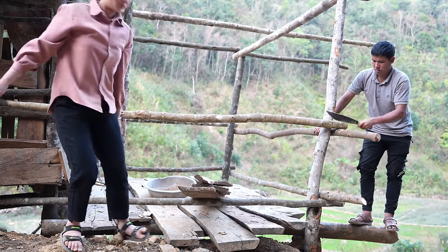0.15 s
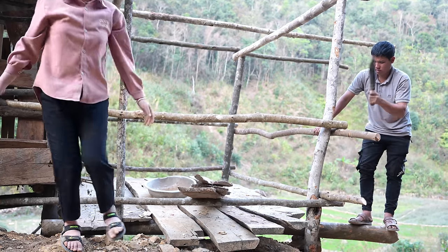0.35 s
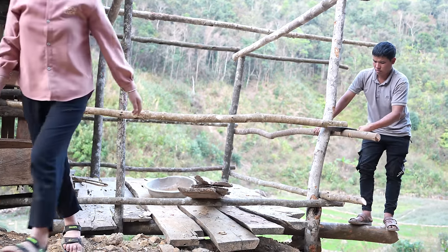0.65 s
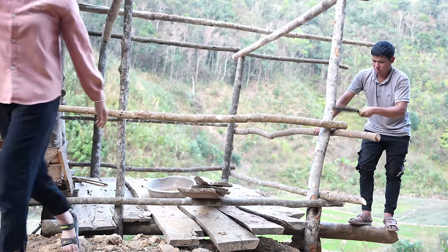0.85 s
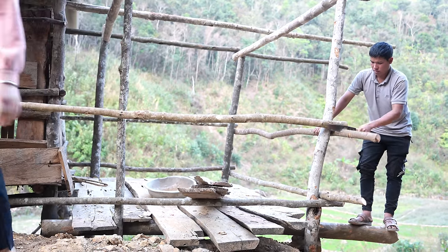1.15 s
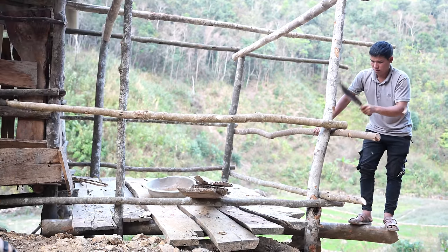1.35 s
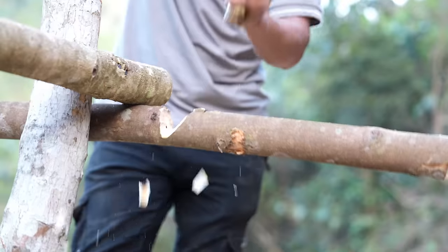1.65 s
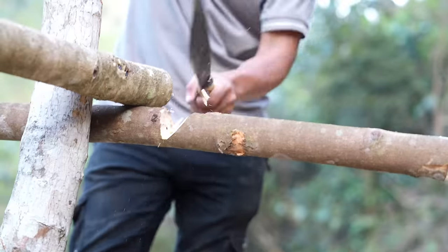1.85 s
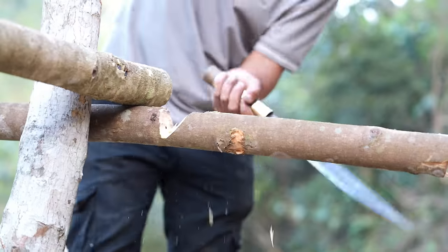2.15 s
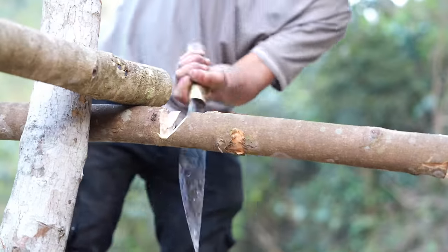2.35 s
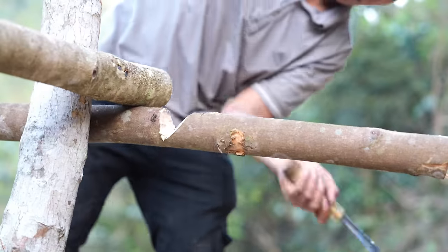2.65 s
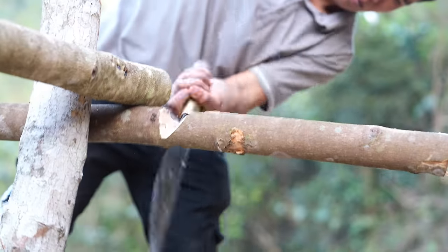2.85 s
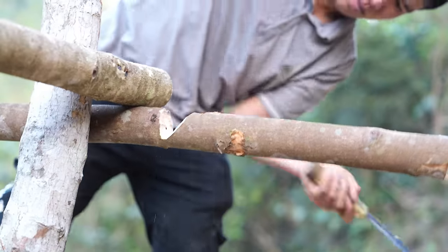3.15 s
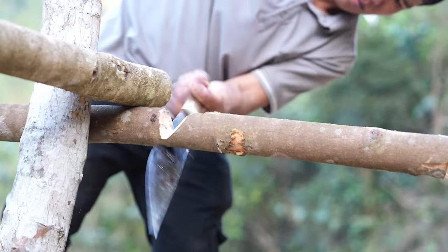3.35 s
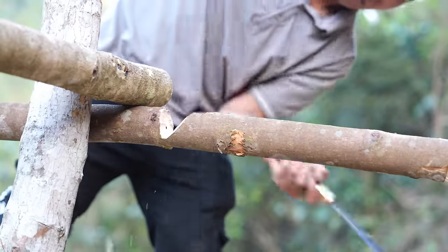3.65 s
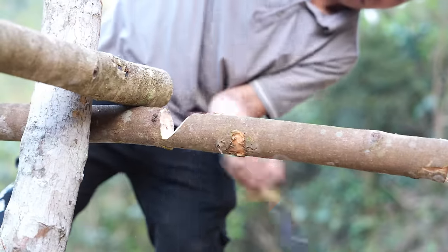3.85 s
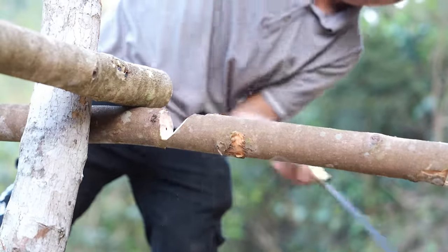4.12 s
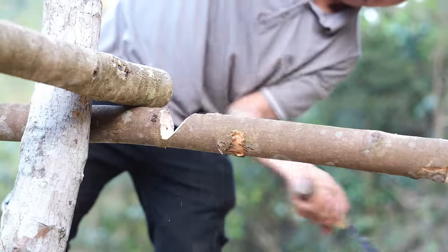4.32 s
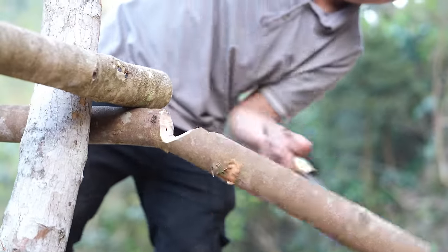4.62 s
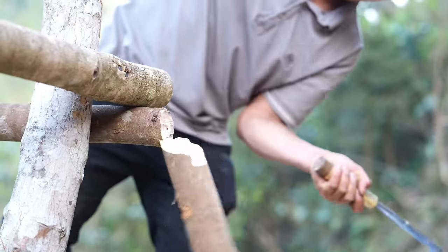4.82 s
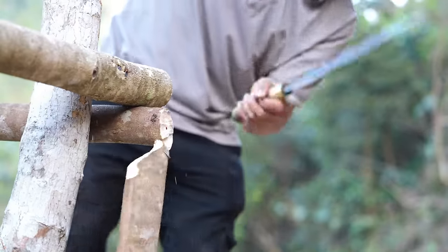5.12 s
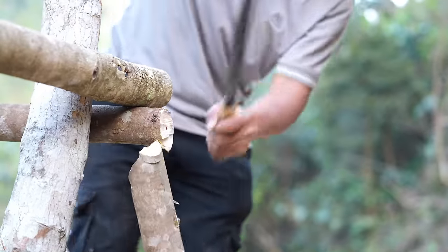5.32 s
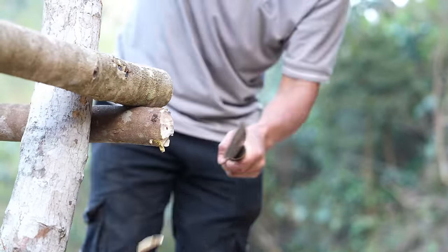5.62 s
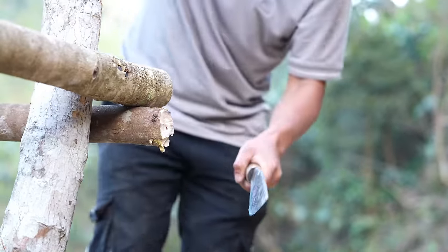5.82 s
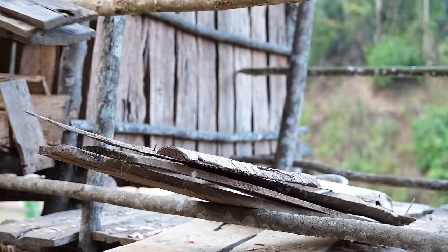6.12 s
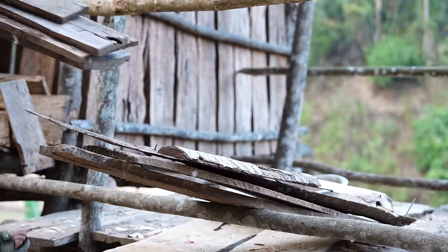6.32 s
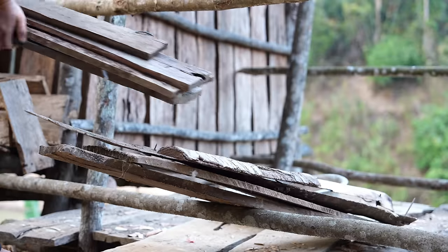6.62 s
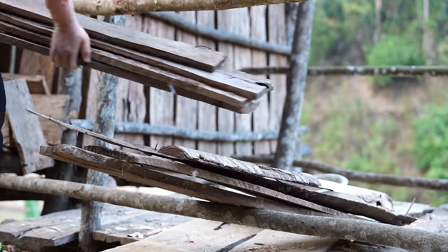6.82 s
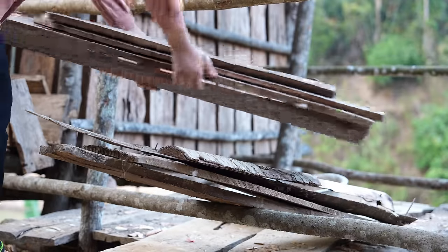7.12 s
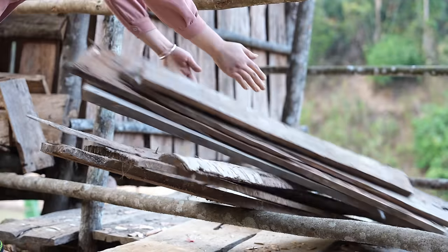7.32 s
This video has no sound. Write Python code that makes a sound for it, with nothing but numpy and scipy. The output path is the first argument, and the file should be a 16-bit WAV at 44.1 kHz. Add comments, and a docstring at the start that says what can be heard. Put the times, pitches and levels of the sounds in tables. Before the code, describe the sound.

Sharp, hollow blade blows on a wooden pole every half second outdoors, a splintering break, thuds of cut wood, then dry planks clattering.

```python
"""A machete chops through a pole of a wooden frame: each blow is a noisy crack plus dispersive bending waves,
whose treble arrives ahead of the bass, with decaying sine notes and a diffuse noise echo of the yard.
Fibres snap as filtered noise bursts, the last strip rips in random clicks, and cut wood drops with a push and modes.
Dropped planks and loose boards clatter as bouncing sets of modes; cloth and wood rub as band-shaped noise.
Gliding sines whistle like a bird over a faint drone and the patchy noise of breeze, leaves and insects."""
import sys
import numpy as np
from scipy import signal
from scipy.fft import rfft, irfft
from scipy.io import wavfile
from scipy.ndimage import uniform_filter1d

SR = 44100
rng = np.random.default_rng(int(sys.argv[2]) if len(sys.argv) > 2 else 0)


def file_out(sig):
    """Save sig as 16-bit WAV at sys.argv[1]."""
    # one column per channel
    cols = np.atleast_2d(sig).T
    # limit, then scale
    lim = np.clip(cols, -1, 1)
    pcm = np.round(lim * 32767).astype(np.int16)
    wavfile.write(sys.argv[1], SR, pcm)


N = 329427
SIZE = 32768  # samples in one event and its filters
HZ, T = np.fft.rfftfreq(SIZE, 1 / SR), np.arange(SIZE) / SR
EDGE_HZ = 16100  # upper band limit

# Machete blows. Each row: start in seconds, strength in dB, extra bass in dB, extra treble in dB,
# extra crack in dB, ring length as a factor, low note in Hz, knock in Hz.
BLOWS = [(0.1147, 0, -7.5, -5, 0.5, 0.72, 218, 2135), (0.637, -8.5, -5, 1, 5.5, 1.046, 132, 830),
         (1.203, -13.5, -0.5, 8, 0, 1.286, 173, 1007), (1.803, -1.5, -1, -1, 4, 1.275, 223.7, 963),
         (2.342, 0, 4, -0.5, -2.5, .52, 182, 1230), (2.876, 1.5, 1, -1, -2.5, 0.99, 263.4, 1015),
         (3.391, -6, 4.5, 7.5, 2, 1.135, 163.5, 1830), (3.9451, -0.5, 0.5, 2.5, 1, 1.095, 169.5, 996),
         (4.447, -12, 6.5, 14, 0, 1.31, 196, 1270), (4.977, -2, 2, -4.5, 0, 0.58, 433, 792),
         (5.407, -11, -4, 6.5, -4, 0.51, 384, 1295), (6.190, -8, -2.5, 2.5, 2, .65, 103, 1666),
         (6.799, -3.5, -3, -7.5, 3.5, 0.3, 109.7, 1566), (7.346, 1.5, -15, -8, 4.5, 0.5, 106.4, 1645)]
# Broad response of the pole. Each row: frequency in Hz, level in dB before the blow's colour.
POLE_RESPONSE = [(40, -27.5), (100, -13.5), (180, 4), (330, -1), (600, -4), (1000, -1), (2000, -0.5),
                 (3200, -20.5), (5200, -10.5), (8000, -27), (16000, -44)]
# Damping of the pole. Each row: frequency in Hz, t60 in seconds before the blow's ring length factor.
POLE_DAMPING = [(100, 0.51), (300, 0.37), (600, 0.33), (1100, 0.14), (2200, 0.064), (8000, 0.12)]
# Resonances of the pole. Each row: frequency in Hz, width in Hz, height in dB above the broad response.
POLE_RESONANCES = [(308.6, 89, 5.6), (407.4, 21, 8.4), (472, 34, 5.3), (620, 140, 3.5), (964, 180, 5.9),
                   (1205, 68, 2.1), (1934, 250, 7.1)]
# Left-right likeness of the bending waves. Each row: frequency in Hz, correlation from -1 to 1.
POLE_LIKENESS = [(200, 1.0), (600, 0.94), (1500, 0.32), (4000, 0.051)]
# Spectrum of the blade's crack. Each row: frequency in Hz, level in dB before the blow's colour.
CRACK_SPECTRUM = [(60, -49), (250, 6.5), (500, -23.5), (1200, -9), (2600, -7), (3500, -15.5), (5200, -9.5),
                  (7000, -18), (10000, -20.5), (16000, -26)]
# Where the wood responds unevenly. Each row: frequency in Hz, share of the unevenness.
UNEVEN_SHARE = [(400, .3), (800, 1), (2500, 1), (5000, .5), (10000, .3)]
# Spectrum of the yard's answer. Each row: frequency in Hz, level in dB before the strength of the event.
YARD_SPECTRUM = [(30, -26.5), (80, -7.5), (200, -14.5), (500, -19.5), (1000, -21.5), (2000, -24.5),
                 (3400, -33), (5400, -29.5), (7000, -33.5), (9500, -38), (11000, -45), (16000, -47.5)]
# Decay of the yard's answer. Each row: frequency in Hz, t60 in seconds before any extra damping.
YARD_DECAY = [(80, 1.31), (250, 0.7), (1000, 0.6), (5000, 0.57), (14000, 0.5)]
# Left-right likeness of the echo. Each row: frequency in Hz, correlation from -1 to 1.
YARD_LIKENESS = [(150, 1), (450, 1), (900, 0.37), (1800, 0.03), (4000, -0.34), (12000, 0.26)]
# Left-right likeness of near contacts. Each row: frequency in Hz, correlation from -1 to 1.
NEAR_LIKENESS = [(200, 1), (700, 0.93), (2000, 0.47), (5000, 0.33), (12000, 0.034)]

# Blows sound from close by between these times, and from across the yard before and after.
CLOSE_FROM_S, CLOSE_TO_S = 1.58, 6.03
# What distance does to a blow. Each row: yard in dB, low note in dB, knock in dB, top octave in dB.
CLOSE_BLOW = (2, -13.5, -12.5, 3)
FAR_BLOW = (8.5, -21, -17.5, 0)
# Lean of the blows to the left. Each row: frequency in Hz, left minus right in dB.
CLOSE_BALANCE = [(120, 5), (280, 2), (600, 7.5), (1500, 2.5), (4000, 0.5), (12000, 3.5)]
FAR_BALANCE = [(200, 0), (1500, -1.2), (6000, -2.5)]
BASS_HZ, MIDDLE_HZ, TREBLE_HZ, TOP_HZ = 395, 1220, 5300, 11000  # corners of the blow's colour
STIR_DB_PER_RING = 14.5  # a pole that rings longer builds up its low note and stirs the yard more

# Snapping fibres and ticks of wood. Each row: start in seconds, level in dB, extra body up to 2 kHz in dB.
FIBRE_SNAPS = [(1.3582, -15.5, 15), (1.949, -14, -5), (2.038, -19, 5.5), (3.667, -10, -3),
               (4.352, -18.5, 3), (4.543, -8.5, 0), (4.581, -13, 4), (4.623, -4.5, -3), (4.657, -4, 3),
               (4.663, -2.5, 4.5), (4.672, 2, -2), (4.708, -13, 6), (5.41, -0.5, 8), (5.425, -5, 5.5),
               (6.795, -10.5, 3), (7.343, -6.5, 9.5), (7.450, -1, 0)]
# Spectrum of a snapping fibre. Each row: frequency in Hz, level in dB before that of the snap.
SNAP_SPECTRUM = [(40, -44), (200, -19), (700, -15.5), (1900, -17.5), (3300, -17), (5500, -15.5),
                 (9000, -19), (16000, -23.5)]
CRUMB_FROM_S, CRUMB_FALL_S = .06, 0.3  # crumbs land this soon after a close blow, and for this long
# Spectrum of the ripping strip. Each row: frequency in Hz, level in dB before that of the crunch.
RIP_SPECTRUM = [(100, -38), (800, -12), (2200, -1), (4500, -23), (8000, -15), (16000, -3)]

# Boards that clatter: dropped planks, and loose boards rattling after far blows. Each row: start in seconds,
# level in dB, settling time in seconds, pitch factor of the board, extra thud in dB.
BOARD_CLATTERS = [(.004, -14.5, 0.0057, 1.1, 13), (.026, -12.5, 0.024, 1.03, 9.5),
                  (.074, -10, 0.0096, 0.81, 4.5), (.116, -7.5, 0.015, 0.93, 9),
                  (0.1634, -7, 0.0066, 1.04, 7.5), (.176, -18.5, 0.059, 0.83, 14), (.227, 0, .008, .9, -7),
                  (.337, -20.5, 0.0053, .9, 7), (.385, -21, .006, .9, 9.5), (.397, -14, 0.011, 0.83, 7.5),
                  (6.208, -4, 0.015, 1.06, 2.5), (6.231, -5.5, 0.02, 0.96, -0.5),
                  (6.803, -3.5, 0.036, 1.04, -1.5), (6.8398, -5, 0.029, 1.07, -5),
                  (6.877, -19.5, 0.026, 0.71, 7), (7.356, -2.5, .012, 1.23, -3.5),
                  (7.37, -4.5, 0.019, 1.13, -5.5), (7.4056, -2.5, .008, 1.18, -17),
                  (7.42, -12, .025, 1.08, -6), (7.439, -6.5, 0.0092, 1.1, -9), (7.451, -6.5, 0.035, .8, 4)]
# Modes of a plank. Each row: frequency in Hz before the pitch factors, level in dB before the clatter's, t60 in s.
BOARD_MODES = [(534, -26, 0.051), (699, -24.5, 0.22), (915, -22.5, .07), (969, -26, 0.02),
               (1143, -21, 0.066), (1280, -10, 0.042), (1469, -17.5, 0.07), (1756, -19.5, 0.078),
               (2090, -19, 0.12), (2240, -25, 0.036), (2840, -38, 0.12)]
# Rasp of split grain. Each row: frequency in Hz before the pitch factor, level in dB before the clatter's.
RASP_SPECTRUM = [(40, -35), (100, -29), (400, -20), (800, 1.5), (1700, -15.5), (2500, -14), (3600, -25),
                 (6000, -33.5), (9000, -71), (16000, -57)]
# Clap of the edges. Each row: frequency in Hz before the pitch factor, level in dB before the clatter's.
CLAP_SPECTRUM = [(200, -72), (1200, 7), (2100, -10.5), (3000, -8), (4200, -43), (12000, -43)]
# Thud of the deck. Each row: frequency in Hz, level in dB before the clatter's.
DECK_SPECTRUM = [(40, -50), (130, -7.0), (250, -6.0), (500, -0.5), (1000, -6.5), (3000, -41.5)]
# Echo of the planks. Each row: frequency in Hz, level in dB before the clatter's.
BOARD_ECHO = [(40, -62), (100, -23), (300, -25), (800, -14.5), (1500, -16.5), (2500, -26.5), (4000, -35),
              (7000, -43.5), (16000, -63)]
SETTLE_DB, SETTLE_PITCH = 10.5, .92  # bounces lose this much, and ring this much lower, after one settling time
BOUNCE_S, BOUNCE_JITTER = .008, .55  # mean time between bounces, and the share of chance in it
BOUNCE_SPREAD_DB = 0.5  # unevenness of the bounces

# A chip and later the cut end on the ground. Each row: start in seconds, thump in dB, ring in dB,
# most excited frequency in Hz, grit in dB.
GROUND_DROPS = [(2.456, -53, -42.5, 1770, -42), (5.7532, -11.5, -17, 800, -14),
                (5.825, -16.5, -25.5, 1230, -12.5), (5.8443, -15.5, -26.5, 1880, -9)]
# Modes of the cut wood. Each row: frequency in Hz, level in dB before the drop's, t60 in seconds.
CUT_WOOD_MODES = [(336, 9, 0.08), (816, -2, 0.18), (934, -2.5, 0.044), (1210, -4.5, 0.045),
                  (1817, -4, 0.052), (1877, 5, 0.068), (2930, -2.5, 0.057)]
# Feet and carried boards. Each row: start in seconds, length in seconds, RMS level in dB, centre in Hz.
FOOT_RUBS = [(1.568, 0.1, -47, 1340), (7.15, 0.2, -57, 1500)]
# Sleeve down, blade swish and arm lift at a full, close blow. Each row: delay in seconds before jitter,
# length in seconds, RMS level in dB, centre in Hz.
ARM_RUBS = [(-.12, 0.051, -54.5, 760), (-.04, 0.04, -56.5, 1070), (0.278, 0.074, -46.5, 836)]
SWING_JITTER_S = 0.019  # scale of the chance in each delay
FULL_SWINGS_UNTIL_S = 4.2  # once the pole is nearly through, short strokes finish it

# Rising bird whistles. Each row: start in seconds, length in seconds, start in Hz, end in Hz, peak level in dB.
BIRD_WHISTLES = [(1.007, 0.29, 5300, 5900, -51), (1.412, .2, 6050, 6500, -54),
                 (2.611, .31, 4930, 5650, -51), (3.159, .24, 5960, 6380, -50.5),
                 (5.844, .19, 5360, 6260, -47)]
# Outdoor air. Each row: frequency in Hz, level in dB before the band levels below.
AIR_SPECTRUM = [(20, -52), (45, -54), (75, -41.5), (130, -49), (300, -52.5), (900, -50.5), (1700, -52.5),
                (3000, -58), (4800, -58), (5900, -53.5), (7000, -58.5), (10000, -66), (16000, -69.5)]
# Long steady stretches of air. Each row: from seconds, extra rumble in dB, extra middle in dB, extra hiss in dB.
AIR_BANDS = [(0, 7.5, 4.5, 3), (1.58, 17.5, 10.5, 7.5), (4.95, 7.5, 4, 5.5), (6.03, -21, 5, -3)]
# Left-right likeness of the air. Each row: frequency in Hz, correlation from -1 to 1.
AIR_LIKENESS = [(150, 1.0), (500, 0.64), (1200, 0.37), (3000, -0.36), (9000, -0.012)]


def chops(crack_pan_db=-3, pole_pan_db=1, yard_pan_db=0.8):
    """Impact excitation: the blade cracks into the wood, the pole rings and the yard answers."""
    out = np.zeros((2, N))
    pole_db = read(POLE_RESPONSE, HZ)
    for hz, width, height_db in POLE_RESONANCES:
        pole_db = pole_db + height_db / (1 + (2 * (HZ - hz) / width) ** 2)
    for s, db, bass, treble, crack_db, length, note_hz, knock_hz in BLOWS:
        yard_db, note_db, knock_db, top_db = CLOSE_BLOW if is_close(s) else FAR_BLOW
        balance = CLOSE_BALANCE if is_close(s) else FAR_BALANCE
        tilt = [(BASS_HZ, bass), (MIDDLE_HZ, 0), (TREBLE_HZ, treble), (TOP_HZ, treble + top_db)]
        colour = db + read(tilt, HZ) + uneven(depth_db=3.6) * read(UNEVEN_SHARE, HZ)
        stir_db = STIR_DB_PER_RING * (length - 1)
        crack = burst(t60=0.047) + 1.28 * burst(t60=0.0087)  # a slower and a sharper decay together
        blow = np.zeros((2, SIZE))
        add(blow, 0, coloured(crack, read(CRACK_SPECTRUM, HZ) + colour + crack_db - 2.5), crack_pan_db)
        add(blow, 0, coloured(bending(length), pole_db + colour), pole_pan_db)
        add(blow, 0, note(knock_hz, db + knock_db, rise=0.0032, t60=0.051))
        add(out, s, leaning(blow, balance))
        low_note = note(note_hz, db + bass + note_db + stir_db, rise=0.032, t60=0.21)
        add(out, s, low_note, pan_db=-3.0)
        answer_db = read(YARD_SPECTRUM, HZ) + colour + yard_db + stir_db
        add(out, s, coloured(echo(rise=0.021), answer_db), yard_pan_db)
    return out


def bending(length, step=.0048, build=2.72, count=26):
    """Dispersion: waves return along longer paths, their speed growing about as the root of frequency."""
    place, flip, stray = rng.random((3, count, 1))
    trips = np.arange(count)[:, None] + place
    gap = step * np.sqrt(1000 / (HZ + 20))  # seconds between arrivals, longer in the bass
    delay = trips * gap
    decay = gain_of(-60 * delay / (length * read(POLE_DAMPING, HZ)))
    arrivals = np.exp(-4j * np.pi * delay * (HZ + 20)) * decay  # doubled phase: group delay equals delay
    arrivals *= np.sign(flip - .5) * (1 - np.exp(-trips / build)) * np.sqrt(gap * SR)
    left = arrivals.sum(0)
    other = (arrivals * np.sign(stray - .5)).sum(0)
    return irfft(partly_alike(left, other, read(POLE_LIKENESS, HZ)))


def burst(t60):
    """Exponential decay: the brief noisy rush of crushed wood at a contact."""
    return noise(NEAR_LIKENESS, flat, count=8192) * gain_of(-60 * T[:8192] / t60)


def note(hz, db, rise, t60):
    """Modal resonance: one sine mode builds up and dies."""
    envelope = gain_of(db + 6 - 60 * T / t60) * (1 - np.exp(-T / rise)) ** 2
    return envelope * np.sin(2 * np.pi * hz * T)


def uneven(depth_db, size=170):
    """Position-dependent response: wood rings unevenly, differently at every struck place (dB on the grid HZ)."""
    bumps = rng.standard_normal(size)
    return depth_db * np.interp(np.sqrt(HZ), np.linspace(0, np.sqrt(HZ[-1]), size), bumps)


def echo(rise=0.0019):
    """Diffuse scattering: sheds, ground and trees return noise that decays by frequency."""
    decaying = noise(YARD_LIKENESS, lambda hz, t: -60 * t / read(YARD_DECAY, hz))
    return decaying * (1 - np.exp(-T / rise))


def is_close(s):
    """Source distance: whether the work is close by at time s."""
    return CLOSE_FROM_S < s < CLOSE_TO_S


def tearing(start=4.652, length=0.058):
    """Successive fracture: the pole sags and its last strip of fibres rips in an uneven crunch."""
    t, per_s, db = T[T < length], 260, -18.5
    strength = gain_of(4 * np.minimum(rng.exponential(1, len(t)), 2.5))
    clicks = (rng.random(len(t)) < per_s / SR) * strength
    swell = np.sin(np.pi * t / length)
    rips = signal.fftconvolve(clicks * swell, np.exp(-t / .0015))[:len(t)]
    crunch = np.maximum(rips, 0) * noise(NEAR_LIKENESS, flat, count=len(t))
    out = np.zeros((2, N))
    add(out, start, coloured(crunch, db + read(RIP_SPECTRUM, HZ)))
    return out


def snap(db, body_db, wet_db=-21):
    """Brittle fracture: one dry fibre breaks as a bright click with its echo."""
    colour = db + read(SNAP_SPECTRUM, HZ) + read([(2000, body_db), (4000, 0)], HZ)
    click = coloured(burst(t60=0.02), colour)
    short_echo = echo() * gain_of(-110 * T)  # extra damping of 110 dB per second
    return click + gain_of(wet_db) * coloured(short_echo, colour)


def splinters(count=4, crumbs_db=-30, crumbs_spread_db=9):
    """Release of fracture energy: fibres snap, and each close blow shakes down a few crumbs of bark."""
    out = np.zeros((2, N))
    for s, db, body_db in FIBRE_SNAPS:
        add(out, s, snap(db, body_db), pan_db=-2)
    for s, *_ in BLOWS:
        if is_close(s):
            for when, size in rng.random((count, 2)):
                crumb = snap(crumbs_db + crumbs_spread_db * size, 0)
                add(out, s + CRUMB_FROM_S + CRUMB_FALL_S * when, crumb)
    return out


def planks(modes_db=-1, thud_level_db=-6, clap_db=1.0, clap_delay_s=0.001495):
    """Repeated impact: dropped or shaken boards clatter in quick bounces, each ringing at its own size."""
    out = np.zeros((2, N))
    for s, db, settle_s, pitch, thud_db in BOARD_CLATTERS:
        hits = bounces(settle_s)
        for delay, bounce_db in hits:
            size = pitch * SETTLE_PITCH ** min(delay / settle_s, 2)
            modes = [(hz * size, level, t60) for hz, level, t60 in BOARD_MODES]
            board = ring(modes, spread_db=4)
            add(out, s + delay, gain_of(db + bounce_db + modes_db) * board, pan_db=-1.5)
        rasp_db = read(RASP_SPECTRUM, HZ / pitch) + db
        add(out, s, coloured(rattle(hits, t60=0.057), rasp_db), pan_db=-0.5)
        edges_db = read(CLAP_SPECTRUM, HZ / pitch) + db + clap_db
        add(out, s + clap_delay_s, coloured(rattle(hits, t60=0.012), edges_db))  # the edges clap a moment later
        deck_db = read(DECK_SPECTRUM, HZ) + db + thud_db + thud_level_db
        add(out, s, coloured(rattle(hits, t60=0.12), deck_db))
        total = np.linalg.norm(gain_of(hits[:, 1]))  # the echo gathers all the bounces
        damped_echo = echo(rise=.004 + settle_s / 2) * gain_of(-30 * T)
        add(out, s, total * coloured(damped_echo, read(BOARD_ECHO, HZ) + db), pan_db=0.5)
    return out


def bounces(settle_s, count=12):
    """Inelastic collision: a first hit and its uneven, dying bounces, as rows (delay s, dB)."""
    gaps = BOUNCE_S * (1 + BOUNCE_JITTER * rng.uniform(-1, 1, count))
    delay = np.r_[0, np.cumsum(gaps)]
    spread_db = np.r_[0, BOUNCE_SPREAD_DB * rng.standard_normal(count)]
    db = spread_db - SETTLE_DB * (delay / settle_s) ** 2
    return np.c_[delay, np.maximum(db, -100)]


def rattle(hits, t60):
    """Addition of incoherent power: one brief rush of crushed wood at every bounce."""
    power = np.zeros(SIZE)
    power[np.round(hits[:, 0] * SR).astype(int)] = gain_of(hits[:, 1]) ** 2
    power = signal.lfilter([1], [1, -gain_of(-60 / (t60 * SR)) ** 2], power)
    return noise(NEAR_LIKENESS, flat) * np.sqrt(power)


def ring(modes, spread_db, count=8192):
    """Modal superposition: dying modes, each struck a little differently every time."""
    t = T[:count]
    hz, db, t60 = np.transpose(modes)[..., None]
    chance, phase = rng.standard_normal((2, len(hz), 1))
    contact = 1 - np.exp(-(t / 0.00031) ** 2)  # soft wood takes a moment to give
    envelopes = gain_of(db + spread_db * chance - 60 * t / t60)
    return contact * (envelopes * np.sin(2 * np.pi * (hz * t + phase))).sum(0)


def wood_drops(push=0.00054):
    """Impulsive loading: cut wood lands with a dull push, a short wooden note and grit."""
    out = np.zeros((2, N))
    u = (T - .002) / push
    push_wave = -u * np.exp((1 - u ** 2) / 2)
    for s, thump_db, ring_db, excited_hz, grit_db in GROUND_DROPS:
        modes = [(hz, db + ring_db - 12 * abs(np.log2(hz / excited_hz)), t60)  # 12 dB less per octave away
                 for hz, db, t60 in CUT_WOOD_MODES]
        add(out, s, gain_of(thump_db) * push_wave)
        add(out, s, ring(modes, spread_db=.5))
        add(out, s, snap(grit_db, 11.4) + coloured(echo(), read(YARD_SPECTRUM, HZ) + thump_db - 0.5))
    return out


def shuffles():
    """Friction noise: soft rubs of cloth, sandals and wood, and the swish of the blade."""
    out = np.zeros((2, N))
    rubs = list(FOOT_RUBS)
    for s, *_ in BLOWS:
        if is_close(s) and s < FULL_SWINGS_UNTIL_S:
            for delay, *rub in ARM_RUBS:
                rubs.append((s + delay + SWING_JITTER_S * rng.uniform(-1.1, 1), *rub))
    for s, length, db, centre_hz in rubs:
        count = int(length * SR)
        stroke = noise(NEAR_LIKENESS, flat)[:, :count] * np.hanning(count)
        band_db = np.maximum(-11 * np.log2((HZ + 1) / centre_hz) ** 2, -28)
        rub = coloured(stroke, band_db)
        add(out, s, gain_of(db) * rub / rub[:, :count].std())
    return out


def bird():
    """Frequency modulation: thin far whistles slide upward, blurred by the trees."""
    out = np.zeros((2, N))
    for s, length, start_hz, end_hz, db in BIRD_WHISTLES:
        count = int(length * SR)
        blur = uniform_filter1d(rng.standard_normal((2, count)), size=60)
        hz = np.linspace(start_hz, end_hz, count) * (1 + .014 * blur / blur.std())
        tone = np.sin(2 * np.pi * np.cumsum(hz, 1) / SR)
        add(out, s, gain_of(db) * tone * signal.windows.tukey(count, .5))
    return out


def drone(start=6.03, length=1.25, hz=105, db=-55):
    """Amplitude modulation: a faint low drone wavers in the distance."""
    count = int(length * SR)
    waver = rng.standard_normal(count)
    for _ in range(2):
        waver = uniform_filter1d(waver, size=2500)
    tone = (1 + .5 * waver / waver.std()) * np.sin(2 * np.pi * hz * np.arange(count) / SR)
    out = np.zeros((2, N))
    add(out, start, gain_of(db) * tone * signal.windows.tukey(count, .1))
    return out


def air(patchy_db=2):
    """Broadband ambient noise: low breeze, far leaves and a band of insects drift in patches."""
    def field(hz, t):
        """Spectral level of the air over frequency and time (dB)."""
        from_s, *levels = np.transpose(AIR_BANDS)
        patches = rng.standard_normal((len(hz), len(t)))
        patches = uniform_filter1d(patches, size=24, axis=0)
        patches = uniform_filter1d(patches, size=7, axis=1)
        db = read(AIR_SPECTRUM, hz) + patchy_db * patches / patches.std()
        for row, level in zip(np.eye(3), levels):
            share = read(list(zip((120, 800, 6000), row)), hz)  # rumble, middle and hiss cross-fade
            steps = level[np.searchsorted(from_s[1:], t)]
            db = db + share * uniform_filter1d(steps, size=5)
        return db
    return noise(AIR_LIKENESS, field, count=N, size=1024)


def noise(same, shape_db, count=SIZE, size=256):
    """Partial coherence: two partly alike channels of noise, shaped by shape_db(Hz, s)."""
    hz = np.fft.rfftfreq(size, 1 / SR)[:, None]
    t = np.arange(2 * count // size + 2) * size / 2 / SR
    left, other = rng.standard_normal((2, len(hz), len(t), 2)).view(complex)[..., 0]
    spectra = partly_alike(left, other, read(same, hz)) * gain_of(shape_db(hz, t))
    return signal.istft(spectra, nperseg=size)[1][:, :count] * np.sqrt(2 / size)


def partly_alike(left, other, likeness):
    """Correlation: the right channel shares the given part of the left."""
    c = np.clip(likeness, -1, 1)
    return np.array([left, c * left + np.sqrt(1 - c ** 2) * other])


def flat(hz, t):
    """White spectrum: 0 dB at every frequency."""
    return 0 * hz


def coloured(x, db):
    """Minimum phase: a causal filter with the gain db on the grid HZ."""
    log_gain = np.log(gain_of(db))
    mirrored = np.r_[log_gain, log_gain[-2:0:-1]]
    spectrum = np.exp(signal.hilbert(mirrored).conj())[:len(HZ)]
    return irfft(rfft(x, SIZE) * spectrum)


def leaning(x, points):
    """Interaural level difference: leans a stereo sound to the left by (Hz, dB) points."""
    db = read(points, HZ)
    return np.array([coloured(x[0], db / 2), coloured(x[1], -db / 2)])


def add(mix, s, sound, pan_db=0):
    """Superposition: mixes a sound in at time s, leaning left by pan_db."""
    part = mix[:, max(round(s * SR), 0):][:, :sound.shape[-1]]
    part += gain_of([[pan_db / 2], [-pan_db / 2]]) * sound[..., :part.shape[1]]


def read(points, hz):
    """Logarithmic frequency scale: joins (Hz, value) points by straight lines."""
    f, value = np.transpose(points)
    return np.interp(np.log(hz + 1), np.log(f + 1), value)


def gain_of(db):
    """Level to amplitude: 20 dB is a factor of ten."""
    return 10 ** (np.asarray(db) / 20)


def scene():
    """Superposition of all sources in the yard."""
    work = chops() + planks() + splinters() + tearing() + wood_drops() + shuffles()
    return work + bird() + drone() + air()


def record(dry):
    """Saturation and band limiting: the loudest peaks are rounded off, then the top is cut."""
    rounded = .7 * np.tanh(dry / .7)
    low_pass = signal.firwin(255, EDGE_HZ, window=("kaiser", 9), fs=SR)
    return signal.oaconvolve(rounded, low_pass[None], "same")


dry = scene()
out = record(dry)
file_out(out)
```